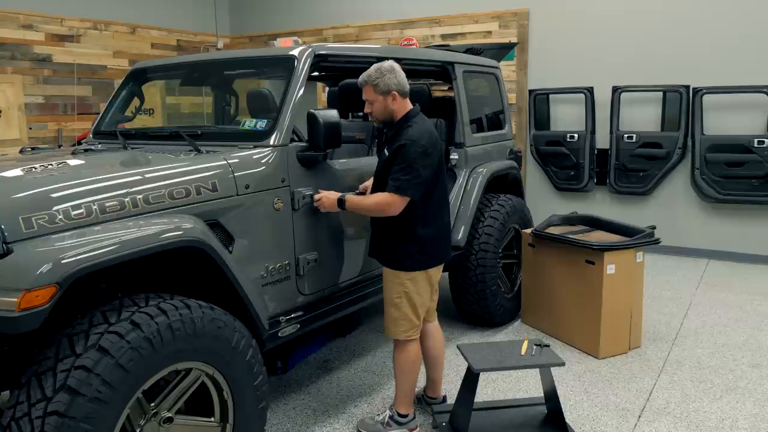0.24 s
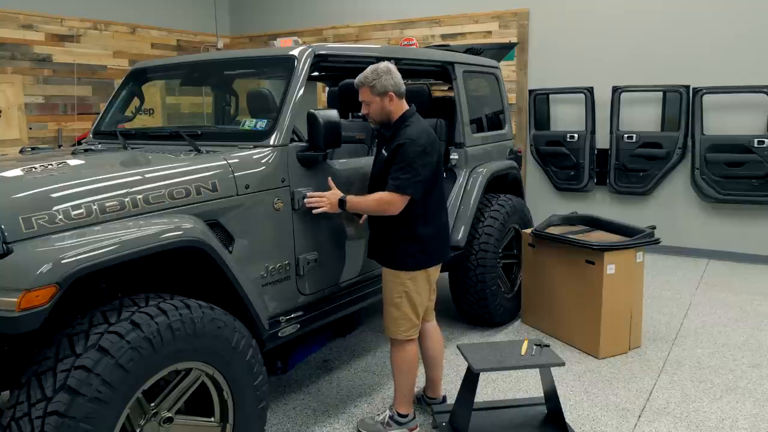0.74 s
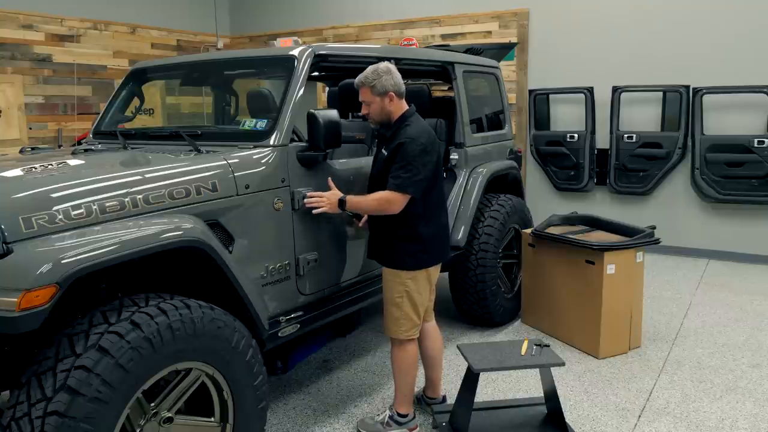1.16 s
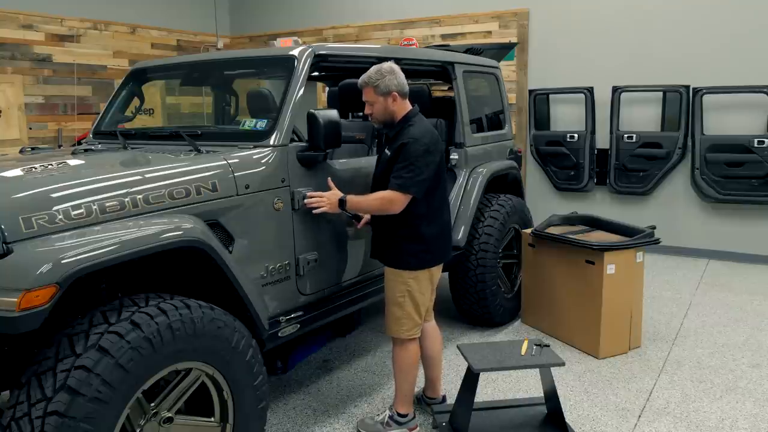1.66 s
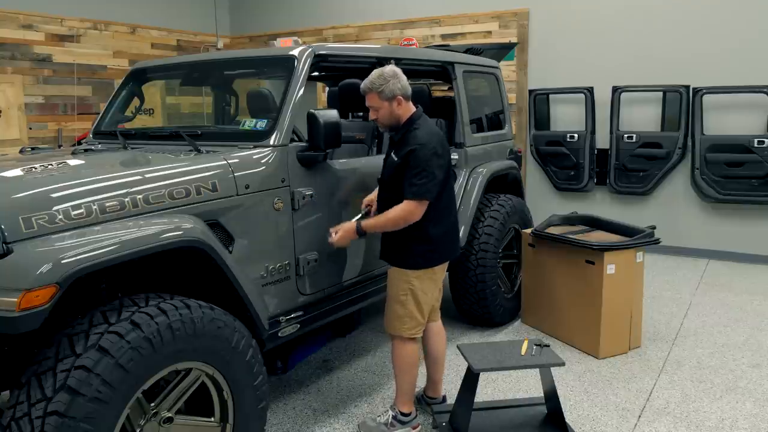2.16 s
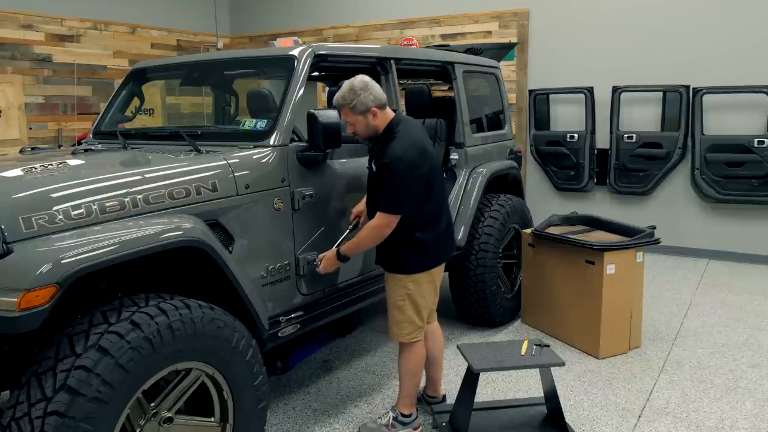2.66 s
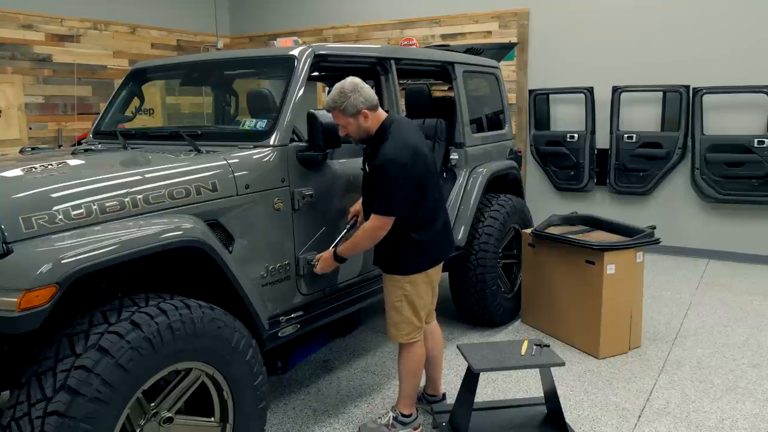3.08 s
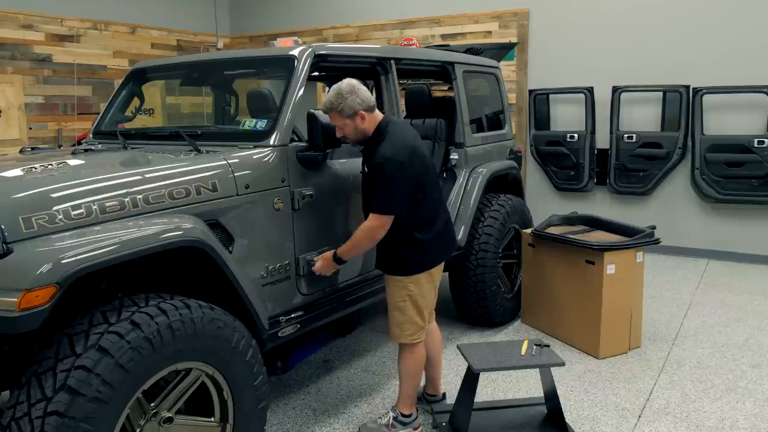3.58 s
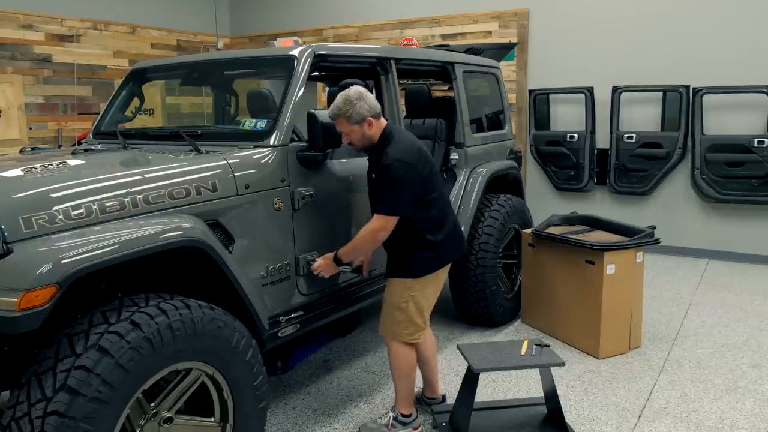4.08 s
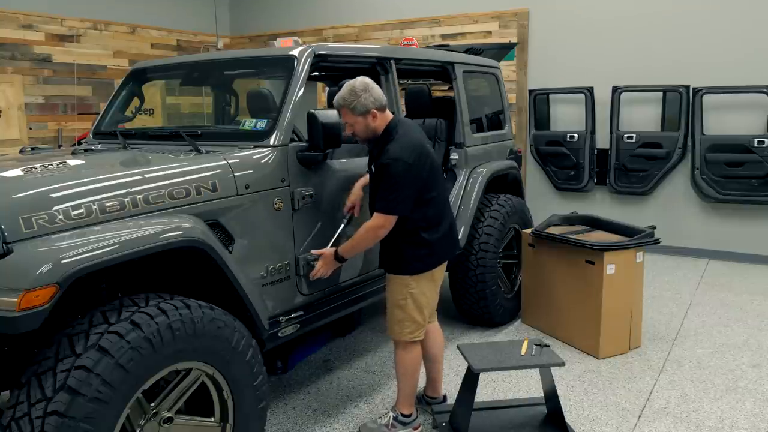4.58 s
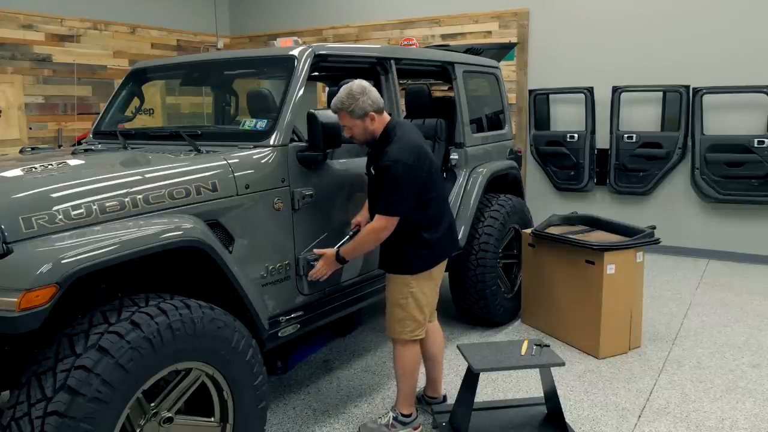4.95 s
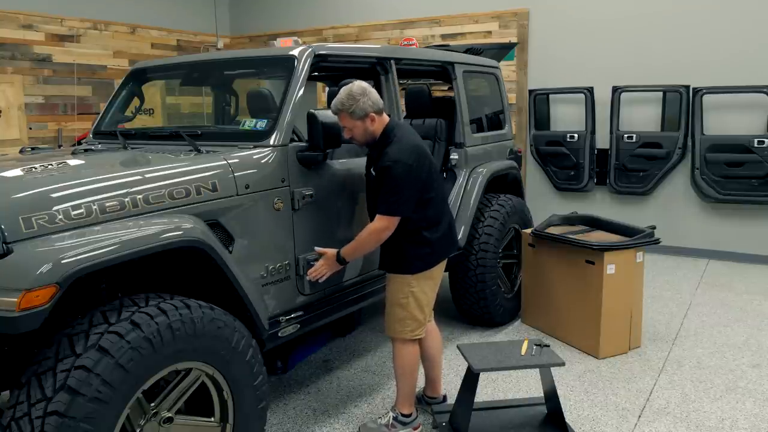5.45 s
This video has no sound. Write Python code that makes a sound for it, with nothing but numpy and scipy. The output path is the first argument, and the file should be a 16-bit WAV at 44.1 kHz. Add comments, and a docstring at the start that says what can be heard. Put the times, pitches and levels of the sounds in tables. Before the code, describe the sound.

In a large echoing workshop, a torque wrench snaps sharply twice with clunks after, then a heavy socket slam and a quick run of faint ratchet ticks.

```python
"""A hand bumps a car door in a large bare workshop; a click-type torque wrench then snaps and clunks back on its
hinge bolts, heard from a small chest microphone. The ratchet ticks on the back swing; socket and hand knock the hinge.
Each blow is a rattle of tiny impacts that excites decaying modes of steel and door panel and jolts the arm.
Filtered noise makes the long echoing tail, the air, hum and hiss, the rumble of arm and shirt, and a short scrape."""
import sys
import numpy as np
from scipy import signal
from scipy.fft import rfft, irfft
from scipy.io import wavfile
from scipy.ndimage import uniform_filter1d

SR = 44100
rng = np.random.default_rng(int(sys.argv[2]) if len(sys.argv) > 2 else 0)


def ratio_of_db(decibels):
    """Turn decibels (scalar or array-like) into linear amplitude factors; 0 dB maps to 1."""
    return 10 ** (np.asarray(decibels, float) / 20)


def wav_out(sig):
    """Save sig, one row per channel (or a flat mono array), as 16-bit PCM at SR to the path in sys.argv[1]."""
    wavfile.write(sys.argv[1], SR, np.round(np.clip(np.atleast_2d(sig).T, -1, 1) * 32767).astype(np.int16))


N = 252252
T = np.arange(N) / SR


def level(x, db):
    """Root-mean-square normalisation: scales the whole signal to a given rms level."""
    return x * ratio_of_db(db) / np.sqrt(np.mean(x ** 2))


def band(x, hz, width, order=1):
    """Resonance-like selection: a band-pass whose edges have the centre as geometric mean."""
    top = 0.45 * SR
    hi = min(np.sqrt(hz ** 2 + width ** 2 / 4) + width / 2, top)
    # a band that would pass the top limit starts an octave below its centre instead
    edges = [hz ** 2 / hi, hi] if hi < top else [hz / 2, hi]
    return signal.sosfilt(signal.butter(order, edges, "band", fs=SR, output="sos"), x)


def walk(rate):
    """Slow random modulation: levels held 1 / rate s and slewed twice; spread near 1."""
    hold = int(SR / rate)
    steps = np.repeat(rng.standard_normal(N // hold + 1), hold)
    slewed = uniform_filter1d(uniform_filter1d(steps, hold), hold)
    return 1.3 * slewed[:N]


def coloured(spectrum, level_db):
    """Stationary noise: a random spectrum weighted by a curve that is straight in dB over log frequency."""
    hz, db = np.transpose(spectrum)
    f = np.arange(N // 2 + 1) * SR / N + 1
    weight = ratio_of_db(np.interp(np.log(f), np.log(hz), db, left=-90, right=-90))
    return level(irfft(rfft(rng.standard_normal(N)) * weight, N), level_db)


def air():
    """Steady noise floor: low room air that swells a little, narrow-band hum and smooth microphone hiss."""
    # room air: (frequency [Hz], relative density [dB per Hz])
    air_spectrum = [(12, -46), (20, -23.5), (39, -2.5), (59, 7), (86, -7.5), (124, -8.5), (151, -23),
                    (265, -27.5), (665, -28.5), (1500, -33.5), (1950, -66.5), (3300, -120)]
    # microphone hiss: (frequency [Hz], relative density [dB per Hz])
    hiss_spectrum = [(880, -31), (1500, -1), (2340, -9), (2690, -5), (4240, -9), (14100, -12), (16000, -19)]
    # narrow noise bands, so the hum wavers: (frequency [Hz], width [Hz], level [dB])
    hum_bands = [(57.8, 6, -66), (117.1, 12, -67)]
    hum = sum(level(band(rng.standard_normal(N), hz, width), db) for hz, width, db in hum_bands)
    room_air = coloured(air_spectrum, -64.5) * ratio_of_db(1.5 * walk(1.0))
    return room_air + hum + coloured(hiss_spectrum, -81)


def rumble():
    """Body conduction: dull, lumpy noise through arm and shirt swells into each heave and ebbs after."""
    # the arm heaves on the wrench: (time of greatest effort [s], level [dB])
    heaves = [(0.0, -61.5), (0.901, -64.5), (1.56, -66.5), (2.249, -68), (3.1, -65.5), (3.881, -66.5),
              (4.2, -66.5), (4.499, -57), (4.72, -62.5)]
    swell_db_per_s, ebb_db_per_s = 61, 69.5
    effort = ratio_of_db(-81)  # arm at rest
    for s, db in heaves:
        slope = np.where(T < s, swell_db_per_s, ebb_db_per_s)
        effort = effort + ratio_of_db(db - slope * np.abs(T - s))
    lumps = ratio_of_db(3 * walk(25))
    return level(band(rng.standard_normal(N) * lumps, 200.0, 290.0, order=2), 0) * effort


def workshop(x):
    """Reverberation: smeared near reflections, then dense noise that decays at its own rate in each band."""
    # tail bands: (centre [Hz], noise level before the bandwidth weighting [dB])
    hall_bands = [(125, -41.5), (250, -43), (500, -50), (1000, -50), (2000, -50), (4000, -51),
                  (6000, -43.5), (9000, -46.5), (13000, -50.5)]
    # reverberation times of the same bands: (t60 [s])
    hall_t60 = [.8, .9, 1.1, 1.25, 1.3, 1.0, .8, .62, .5]
    # nearest surfaces: (delay [s], level [dB])
    echoes = [(.007, -10), (0.028, -20.5)]
    t = np.arange(int(1.5 * SR)) / SR
    tail = 0
    for (hz, db), t60 in zip(hall_bands, hall_t60):
        noise = level(band(rng.standard_normal(len(t)), hz, 0.64 * hz, order=2), db)
        decay = np.exp(-np.log(1000) * t / t60)
        tail = tail + noise * np.sqrt(hz / SR) * decay  # bandwidth grows with the centre
    tail *= 1 - np.exp(-t / 0.007)  # gradual build-up
    for delay, db in echoes:
        # rough surfaces smear each reflection over a few ms
        smear = rng.standard_normal(len(t)) * np.exp(-np.abs(t - delay) / 0.0036)
        tail += ratio_of_db(db) * smear / np.sqrt(np.sum(smear ** 2))
    return signal.fftconvolve(x, tail)[:N]


def scrape():
    """Dry sliding friction: dense uneven grains start sharply, fade and stop."""
    start_s, length_s, edge_s = 0.225, 0.243, 0.0031
    fade_db_per_s = 45
    grains = band(rng.standard_normal(N) * ratio_of_db(1.8 * walk(105.3)), 1900.0, 2200.0)
    since = T - start_s
    gate = np.clip(np.minimum(since, length_s - since) / edge_s, 0, 1)
    return level(grains, -70) * gate * ratio_of_db(-fade_db_per_s * np.maximum(since, 0))


def burst(rise_s):
    """Broadband excitation: a rattle of tiny impacts, whitened, that swells and dies."""
    t = np.arange(int(12 * rise_s * SR)) / SR
    shape = t / rise_s * np.exp(-t / rise_s)
    spectrum = rfft(rng.standard_normal(SR // 2)[:len(t)] * shape)
    white = irfft(spectrum / (np.abs(spectrum) + 1e-9), len(t))
    return white * np.sqrt(shape)


def ring(modes, t, scatter_db):
    """Modal superposition: decaying sines, neighbours in opposite phase, strengths scattered at every blow."""
    hz, db, t60 = np.transpose(modes)[:, :, None]
    sign = (-1) ** np.arange(len(modes))[:, None]
    strength = ratio_of_db(db + scatter_db * rng.standard_normal(db.shape)) * sign
    decay = 1000.0 ** (-t / t60)
    return np.sum(strength * np.sin(2 * np.pi * hz * t) * decay, axis=0)


def head(x, db):
    """Onset normalisation: sets the rms level of the first 40 ms."""
    return x * ratio_of_db(db) / np.sqrt(np.mean(x[:SR // 25] ** 2))


def blows(table, rattle_s, push_s, spread, soft_hz, scatter_db):
    """Impact excitation: each blow cracks, rings the steel, pushes the door panel more slowly, jolts the arm."""
    # steel of the wrench: (frequency [Hz], relative strength [dB])
    steel_table = [(1265, -0.5), (3345, -10), (4200, -16.5), (4810, 0), (5400, -12.5), (6000, -5.5),
                   (6800, -16.5), (7700, -10), (8400, -14), (9100, -10), (9800, -7.5), (10600, -11),
                   (11850, -4.5), (12500, -5.5), (13250, -3), (14000, -13.5), (14600, -10), (15500, -13.5)]
    # door panel: (frequency [Hz], relative strength [dB], t60 [s])
    door_modes = [(103.4, -4.5, 0.16), (152, 0, .12), (194, -2, .09), (253, 1.5, 0.037), (298, -4.5, 0.099),
                  (349, -8, 0.11), (436, -10, .06), (515, -4.5, 0.051), (607, -6, 0.052), (646, -8, 0.042),
                  (745, -8.5, 0.04), (850, -11, 0.061), (1010, -12.5, 0.064), (1130, -11.5, 0.058),
                  (1284, -9.5, 0.033), (1662, -16, 0.074), (2140, -20, .03), (2600, -26, 0.032),
                  (3300, -14, .02)]
    grip_t60_s = 0.01  # the grip damps every steel mode alike
    steel_modes = [(f, db, grip_t60_s) for f, db in steel_table]
    out = np.zeros((2, N + SR))  # airborne sound, jolt
    t = np.arange(SR // 3) / SR
    soft = signal.butter(2, soft_hz, fs=SR, output="sos")
    for s, crack_db, hz, steel_db, door_db, jolt_db in table:
        rattle = np.pad(burst(rattle_s), (0, len(t)))[:len(t)]
        crack = band(rattle, hz, spread * hz, order=2)
        crack *= ratio_of_db(crack_db) / np.abs(crack).max()
        steel = signal.fftconvolve(rattle, ring(steel_modes, t, scatter_db))[:len(t)]
        push = signal.sosfilt(soft, burst(push_s))
        door = signal.fftconvolve(push, ring(door_modes, t, scatter_db))[:len(t)]
        jolt = np.sin(2 * np.pi * 42.0 * t) * np.exp(-t / 0.0035)
        i = int(max(s, 0) * SR)
        out[0, i:i + len(t)] += crack + head(steel, steel_db) + head(door, door_db)
        out[1, i:i + len(t)] += head(jolt, jolt_db)
    return out[:, :N]


def alike(table, kind):
    """Proportional excitation: one kind shares its crack centre; steel ring and jolt follow the crack."""
    hz, steel_db, jolt_db = kind
    return [(s, db, hz, db + steel_db, door_db, db + jolt_db) for s, db, door_db in table]


def scene():
    """Superposition: blows reverberate over the steady floor; jolts arrive through the body only."""
    # the wrench snaps, clunks back and ticks: (time [s], crack peak [dB], door ring [dB])
    snaps = [(0.795, -12.5, -31), (1.505, -12.5, -31)]
    clunks = [(1.0605, -25.5, -35), (1.677, -26.5, -34.5)]
    ticks = [(4.2512, -35.5, -70), (4.3116, -34.5, -60.5), (4.3686, -35.5, -65), (4.4182, -35, -57),
             (4.4656, -35.5, -52.5), (4.5271, -35, -59)]
    # socket on bolt and hinge: (time [s], crack peak [dB], crack centre [Hz], door ring [dB], jolt [dB])
    knock_table = [(1.814, -54.5, 780, -63, -72), (1.885, -53, 750, -63, -56.5),
                   (1.927, -39, 3600, -59, -61), (2.905, -28, 1860, -46.5, -56.5),
                   (3.919, -47.5, 1400, -39, -70), (4.584, -50, 1485, -61.5, -60)]
    # hand against the door: (time [s], crack peak [dB], door ring [dB])
    bumps = [(.0, -46, -41), (3.062, -56.5, -50.5), (3.24, -81, -65), (4.675, -56.5, -48.5),
             (4.754, -58.5, -52)]
    # the socket drops hard onto the bolt: (time [s], crack peak [dB], door ring [dB])
    slams = [(3.9355, -13, -25.5)]
    # contacts in the order of tables below: (rattle rise [s], rise of the push on the door [s],
    # crack width [centres], treble limit of the push [Hz], scatter of the modes [dB])
    contacts = [(.0016, .003, 1.6, 4000, 1.5), (.0014, .003, 1.0, 4000, 2.0), (.0006, .003, 1.0, 1500, 3.5),
                (.0014, .0022, .5, 4000, 2.2), (.003, .004, 1.0, 600, 2.5), (.0014, .003, 1.2, 4000, 2.0)]
    # how strongly each kind of contact carries into the room: (gain [dB])
    carry_db = [-0.5, -3.5, -3.5, -0.5, 0.5, -3]
    knocks = [(s, db, hz, db - 41.5, door_db, jolt_db) for s, db, hz, door_db, jolt_db in knock_table]
    # each kind: (crack centre [Hz], steel ring against crack [dB], jolt against crack [dB])
    tables = [
        alike(snaps, (2500, -16, -17)),
        alike(clunks, (2600, -29, -17.5)),
        alike(ticks, (3380, -22, -15.5)),
        knocks,
        alike(bumps, (1200, -34.5, -0.5)),
        alike(slams, (1350, -42, -27.5)),
    ]
    struck = [blows(table, *contact) for table, contact in zip(tables, contacts)]
    near, jolts = np.transpose(struck, (1, 0, 2))
    echo = workshop(ratio_of_db(np.array(carry_db)) @ near)
    mix = near.sum(axis=0) + jolts.sum(axis=0) + echo + air() + rumble() + scrape()
    return mix[None]


def roll_off(x):
    """The treble ends steeply here."""
    return signal.sosfilt(signal.butter(12, 16820, fs=SR, output="sos"), x)


def record(dry):
    """Band limitation: a steep low-pass cuts the top of the finished mix."""
    low_pass = signal.cheby1(8, 0.5, 15900, fs=SR, output="sos")  # ripple [dB], edge [Hz]
    mix = signal.sosfilt(low_pass, dry)
    return roll_off(mix)


dry = scene()
out = record(dry)
wav_out(out)
```